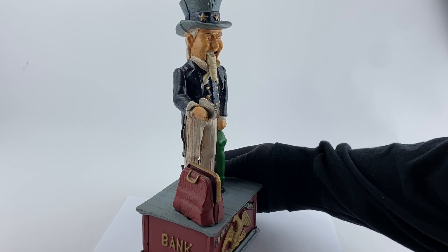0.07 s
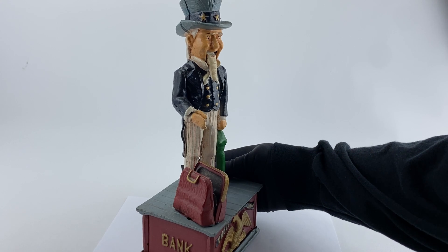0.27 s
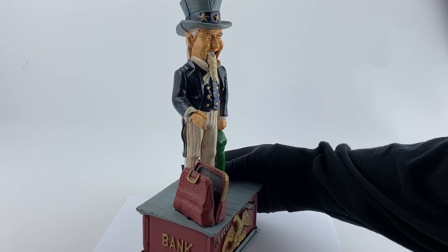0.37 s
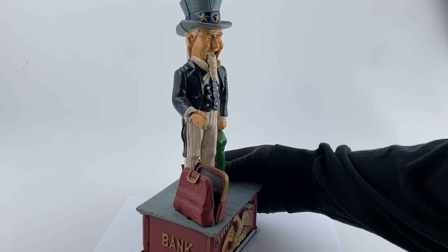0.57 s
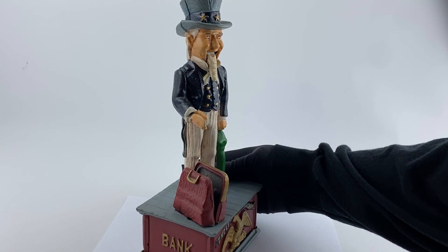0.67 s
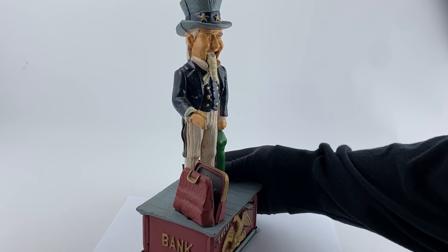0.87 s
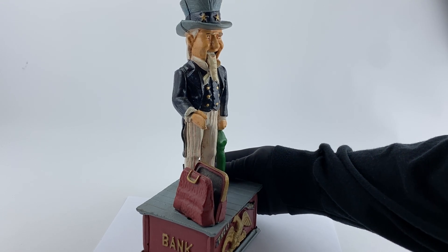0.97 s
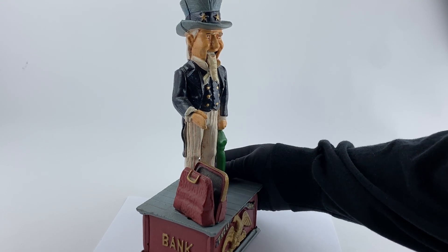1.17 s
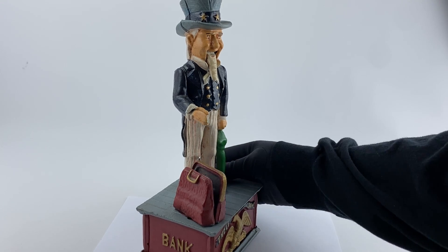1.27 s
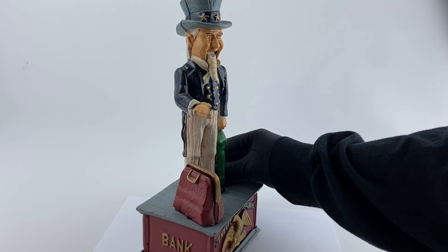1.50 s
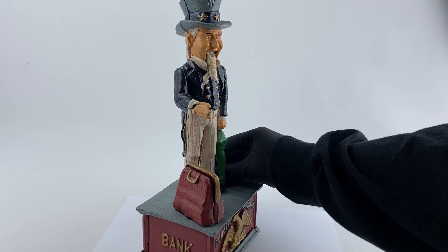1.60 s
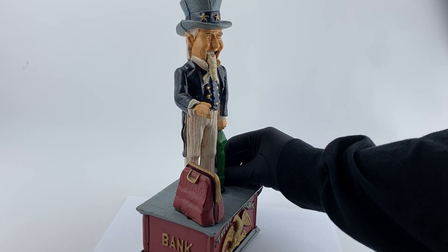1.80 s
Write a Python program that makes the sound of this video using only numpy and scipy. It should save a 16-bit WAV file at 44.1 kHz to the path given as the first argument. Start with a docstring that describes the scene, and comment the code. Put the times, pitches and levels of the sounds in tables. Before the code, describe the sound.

Heavy iron coin bank clanks sharply, a dropped coin bounces and tinkles, lever returns with softer clatter

```python
"""A hand works a cast-iron mechanical bank on a table in a quiet room, heard by a close stereo microphone.
A low hush of filtered noise lasts throughout; the table hums at each push, a swelling and dying sine.
The lever clatters down: bursts of noise shake the dying tones of the iron.
A coin falls, bounces and rings inside: high dying sines, with knocks on the iron made like the clatter.
At last the lever clatters back while the table hums again."""
import sys
import numpy as np
from scipy import signal
from scipy.fft import rfft, irfft, next_fast_len
from scipy.io import wavfile
from scipy.ndimage import map_coordinates

SR = 44100
rng = np.random.default_rng(int(sys.argv[2]) if len(sys.argv) > 2 else 0)


def field_ratio(decibels):
    """Amplitude ratio for a level in dB (20 dB per decade); scalars and array-likes work."""
    return 10 ** (np.asarray(decibels, dtype=float) / 20)


def persist_wave(psi):
    """Save psi, clipped to +-1, as 16-bit WAV."""
    counts = np.round(np.clip(psi, -1, 1) * 32767).astype(np.int16)
    wavfile.write(sys.argv[1], SR, np.atleast_2d(counts).T)


N = 81585  # length of the scene in samples


def along(points, hz):
    """Read a curve of (frequency, value) points, with frequency on a log axis."""
    f, v = np.transpose(points)
    return np.interp(np.log(hz + 1), np.log(f + 1), v)


def filtered(x, response):
    """Shape the spectrum of x by a response that is a function of frequency."""
    n = x.shape[-1]
    m = next_fast_len(n + 4096)
    spectrum = rfft(x, m) * response(np.fft.rfftfreq(m, 1 / SR))
    return irfft(spectrum, m)[..., :n]


def add(track, s, x):
    """Mix x into the track at s seconds."""
    i = round(s * SR)
    track[..., i:i + x.shape[-1]] += x


# colour of the room's hush: (frequency [Hz], relative level [dB])
AIR_COLOUR = [(25, -42), (55, 2.5), (85, -8), (120, -4.5), (240, -11), (500, -19), (1200, -28), (3000, -37),
              (11000, -64.5)]
# how alike the hush is on left and right: (frequency [Hz], likeness [0 to 1])
AIR_ALIKE = [(60, 1), (700, 0.09), (5000, 0.12)]
AIR_DB = -48


def air():
    """The room's low hush: steady noise, nearly the same on both sides in the bass and wide above it."""
    def mid_and_side(hz):
        angle = np.arccos(np.clip(along(AIR_ALIKE, hz), -1, 1)) / 2
        return field_ratio(along(AIR_COLOUR, hz)) * [np.cos(angle), np.sin(angle)]

    mid, side = filtered(rng.standard_normal((2, N)), mid_and_side)
    return field_ratio(AIR_DB) * np.array([mid + side, mid - side]) / np.std(mid)


# the table humming after pushes: (time [s], peak level [dB], time to reach the peak [s])
TABLE_HUMS = [(0.083, -36, 0.013), (0.2127, -11, 0.018), (0.289, -22, 0.02), (0.376, -24.5, 0.013),
              (0.609, -27, 0.019), (1.353, -24, 0.019), (1.446, -22.5, 0.014), (1.487, -35.5, 0.016),
              (1.523, -26.5, 0.026)]
TABLE_HZ = 141.26  # lowest mode of the table top
SWELL = 1.36  # power that sharpens the swell


def table():
    """The table top swells and dies at its lowest mode after each push."""
    out, t = np.zeros(N + SR), np.arange(SR // 3) / SR
    for s, db, rise in TABLE_HUMS:
        u = t / rise
        swell = (u * np.exp(1 - u)) ** SWELL
        add(out, s, field_ratio(db) * swell * np.sin(2 * np.pi * TABLE_HZ * t))
    return out[:N]


# how long the room's tail takes to fall by 60 dB: (frequency [Hz], time [s])
ROOM_T60 = [(300, 0.43), (15000, 0.23)]


def in_room(x, wet_db):
    """The stereo sound plus a fresh tail of the room: noise whose treble dies sooner than its bass."""
    hz, t, z = signal.stft(rng.standard_normal((2, SR // 2)), SR, nperseg=256)
    fading = z * field_ratio(-60 * t / along(ROOM_T60, hz)[:, None])
    tail = signal.istft(fading, SR, nperseg=256)[1]
    tail = tail / np.linalg.norm(tail[0])
    late = np.pad(x, ((0, 0), (200, 0)))  # the tail starts 200 samples after the sound
    wet = field_ratio(wet_db) * signal.fftconvolve(late, tail, axes=1)
    add(wet, 0, x)
    return wet


# tones of the cast iron: (frequency [Hz], level [dB])
IRON_MODES = [(248, -1.5), (420, -2.5), (636, -3), (1050, -3), (1209, -0.5), (1438, -0.5), (1850, -8.5),
              (2075, -3.5), (2597, 2.5), (3115, -1.5), (4200, -5), (5500, -0.5), (10375, 0)]
# time for a freely ringing iron tone to fall by 60 dB: (frequency [Hz], time [s])
IRON_T60 = [(1100, .05), (2600, 0.073), (4200, .14), (5500, .03)]
# colour of the broad noise of a contact: (frequency [Hz], level [dB])
CRACK_COLOUR = [(100, -41.5), (400, 5.5), (1200, 3.5), (3000, 7), (6000, 4), (10000, 7), (12000, -1),
                (15500, 2.5)]
RISE, DIE_AWAY = 0.12, 1  # rise and fade times as shares of the rattle length
SPIKY_DB = 2.5  # random roughness of the rattle
APART = 0.64  # how unlike left and right are
MODES_DB = 4.5  # iron tones against crack
DETUNE = 0.018  # random phase step of the rough casting's tones [radians a sample]
BODY_OCTAVES, TREBLE_HZ = 0.23, 5790  # width of the body peak; middle of the treble slope
IRON_ROOM_DB = -7


def iron(rows, freedom=1):
    """A contact is a rattle of tiny blows: a broad crack plus the casting's tones, fullest where struck."""
    out, t = np.zeros((2, N + 2 * SR)), np.arange(SR // 5) / SR
    hz, level = np.transpose(IRON_MODES)[..., None]
    t60 = freedom * along(IRON_T60, hz)
    energy_decay = field_ratio(-120 * t / t60) / (t60 * SR)
    for s, db, length, body_hz, body_db, treble_db in rows:
        attack = (1 - np.exp(-t / (RISE * length))) ** 2
        fade = np.exp(-np.maximum(t - length, 0) / (DIE_AWAY * length) - t / length)
        blows = np.repeat(rng.standard_normal(len(t)), 50)[:len(t)]  # a new strength every 50 samples
        rattle = attack * fade * field_ratio(SPIKY_DB * blows)
        rattle = rattle / np.sqrt(np.sum(rattle ** 2) / (length * SR))

        noise = rng.standard_normal((3, len(t)))
        stereo_noise = noise[0] + APART * noise[1:]
        crack = filtered(rattle * stereo_noise, lambda f: field_ratio(along(CRACK_COLOUR, f)))

        # the rattle feeds each tone, which holds the energy for a while
        energy = signal.fftconvolve(rattle[None] ** 2, energy_decay, axes=1)[:, :len(t)]
        stored = np.sqrt(abs(energy))
        start = rng.uniform(0, 2 * np.pi, hz.shape)
        stray = np.cumsum(DETUNE * rng.standard_normal((len(hz), len(t))), axis=1)
        side_phase = APART * rng.standard_normal((2, len(hz), 1))
        phase = 2 * np.pi * hz * t + start + stray + side_phase
        strength = field_ratio(MODES_DB + level + 1.9 * rng.standard_normal(hz.shape))
        ring = np.sum(strength * stored * np.sin(phase), axis=1)

        def colour(f):
            octaves_off = np.log2((f + 1) / body_hz)
            body = body_db * np.exp(-(octaves_off / BODY_OCTAVES) ** 2 / 2)
            treble = treble_db / (1 + (TREBLE_HZ / (f + 1)) ** 2)
            return field_ratio(body + treble)

        # 256 samples of lead-in leave room for the filter to spread backwards
        hit = filtered(np.pad(field_ratio(db) * (crack + ring), ((0, 0), (256, 0))), colour)
        add(out, s - 256 / SR, in_room(hit, IRON_ROOM_DB))
    return out[:, :N]


# iron parts striking:
# (time [s], level [dB], rattle length [s], body frequency [Hz], body boost [dB], treble boost [dB])
CLANKS = [(.2055, -25.5, 0.014, 1046, 13.5, -2.5), (.217, -23.5, 0.017, 2770, 3.5, -5.5),
          (.232, -23, 0.0075, 2800, -5.5, -0.5), (.2425, -22.5, 0.012, 1380, -5, -13),
          (.249, -19, 0.0063, 1150, 9.5, -18), (.263, -27, 0.0099, 1100, 6, -61),
          (.6065, -22.5, 0.0068, 2000, 8, 10.5), (.657, -28, 0.0049, 2080, 9.5, 7),
          (.815, -51.5, 0.017, 870, 20, -25), (1.341, -36.5, 0.0079, 3090, -6, -11),
          (1.351, -32, 0.0078, 926, 14.5, -22.5), (1.384, -34.5, 0.0078, 970, 11.5, -19),
          (1.402, -39.5, 0.0097, 2530, -1, -12), (1.436, -30, 0.021, 2910, -6.5, -18.5),
          (1.457, -33, 0.015, 1430, 8, -41), (1.496, -36, 0.012, 1430, 1, -33),
          (1.506, -35, 0.0091, 1350, 6, -53), (1.530, -44, 0.011, 950, 15.5, -34)]


def lever_clatter():
    """Iron strikes iron; the parts press on each other, so their tones die sooner than when free."""
    return iron(CLANKS, freedom=0.62)  # share of the free ringing time that is left


def ringing(modes, t, scatter_db):
    """Dying sines, struck a little differently each time."""
    total = 0
    for hz, db, t60 in modes:
        level = db + scatter_db * rng.standard_normal() - 60 * t / t60
        total = total + field_ratio(level) * np.sin(2 * np.pi * hz * t)
    return total


# the coin set ringing: (time [s], low tone level [dB], middle pair level [dB], top pair level [dB])
COIN_TOUCHES = [(0.331, -52.5, -31, -15), (.368, -31.5, -17.5, -18.5), (0.391, -35.5, -19.5, -7),
                (.428, -34.5, -33, -18.5), (.45, -34, -31.5, -24.5), (.502, -48, -45, -18.5),
                (.537, -40.5, -42.5, -32.5), (.607, -52.5, -33.5, -44.5), (0.863, -35.5, -33, -51.5),
                (.905, -52, -35, -56)]
# coin tones in three families, low, middle pair and top pair:
# (frequency [Hz], level [dB], time to fall by 60 dB [s])
COIN_MODES = [
    [(5440, 0, .08)],
    [(9390, 0, .23), (9130, -6, .2)],
    [(15685, 0, .18), (15535, -14, .15)],
]
TOUCH_S = 0.0013  # how fast a touch starts and stops the ring
WOBBLE_DB, WOBBLES_PER_S = 3, 40  # the tumbling disc turns towards and away
COIN_ROOM_DB = -12


def coin_ringing():
    """Each touch stops the disc's ring and sets its three families going anew; they waver as it tumbles."""
    out, t = np.zeros((2, N + 2 * SR)), np.arange(SR // 2) / SR

    def waver():
        smooth = map_coordinates(rng.standard_normal(100), [np.minimum(t * WOBBLES_PER_S, 99)])
        return field_ratio(WOBBLE_DB * smooth)

    times = [row[0] for row in COIN_TOUCHES]
    free_times = np.diff(times, append=N / SR)  # seconds until the next touch
    for (s, *levels), free_s in zip(COIN_TOUCHES, free_times):
        ring = sum(field_ratio(db) * waver() * ringing(family, t, scatter_db=1)
                   for db, family in zip(levels, COIN_MODES))
        begin = 1 - np.exp(-t / TOUCH_S)
        stop = np.exp(-np.maximum(t - free_s, 0) / TOUCH_S)
        add(out, s, in_room(np.tile(ring * begin * stop, (2, 1)), COIN_ROOM_DB))
    return out[:, :N]


# the coin knocking the iron:
# (time [s], level [dB], rattle length [s], body frequency [Hz], body boost [dB], treble boost [dB])
KNOCKS = [(0.3313, -33.5, 0.023, 685, 5, -7.5), (0.3667, -26.5, 0.0065, 2860, 7, 12),
          (0.39, -35, 0.0047, 2700, -28, 9.5), (0.446, -48.5, 0.022, 1203, 10, 12.5),
          (0.501, -45.5, 0.012, 1020, 5.5, 14), (0.535, -47.5, 0.015, 2520, 3.5, -7),
          (0.86, -37.5, 0.0054, 2450, 8.5, 7.5), (0.903, -46, 0.0086, 2750, 8, 6),
          (0.927, -57.5, 0.012, 2480, 10.5, 10.5)]


def coin_knocks():
    """The coin knocks the iron, whose tones then ring freely."""
    return iron(KNOCKS)


def scene():
    """Lever, coin, table and room together."""
    return lever_clatter() + coin_knocks() + coin_ringing() + table() + air()


def roll_off(x):
    """The treble ends steeply here."""
    return signal.sosfilt(signal.butter(12, 16990, fs=SR, output="sos"), x)


# share of the sound common to both sides: (frequency [Hz], share [0 to 1])
COMMON = [(200, 0.62), (600, 0.294), (5000, 0.1), (7500, 0.6)]
# left side louder than right: (frequency [Hz], level difference [dB])
LEFT_LOUDER = [(100, 0), (400, -3), (1000, 0.8), (4500, 3), (5500, 6), (8000, 1)]
# left side ahead of right, negative when late: (frequency [Hz], phase lead [radians])
LEFT_LEAD = [(0, 0), (1000, .8), (1900, -.1), (3000, 1.1), (5800, 1.), (6500, 0), (15500, -15.55),
             (17000, -15.6)]
TOP_HZ = 15850  # the sound ends steeply above this


def record(dry):
    """The microphone pair: bass and treble more common to both sides, the high treble late on the left."""
    def share(hz):
        return np.clip(along(COMMON, hz), 0, 1)

    both = filtered(dry, lambda hz: 1 - share(hz)) + filtered(dry.mean(axis=0), share)
    f, lead = np.transpose(LEFT_LEAD)
    half = np.array([[1], [-1]]) / 2  # each side takes half of a difference

    def microphones(hz):
        level = field_ratio(half * along(LEFT_LOUDER, hz))
        steep_top = 1 / np.sqrt(1 + (hz / TOP_HZ) ** 400)
        return level * steep_top * np.exp(1j * half * np.interp(hz, f, lead))

    return roll_off(filtered(both, microphones))


dry = scene()
out = record(dry)
persist_wave(out)
```